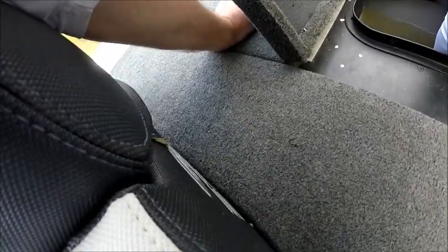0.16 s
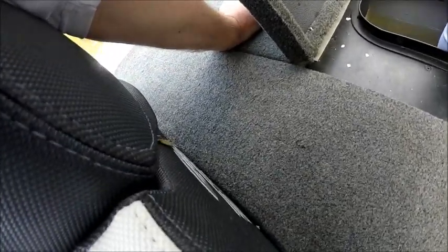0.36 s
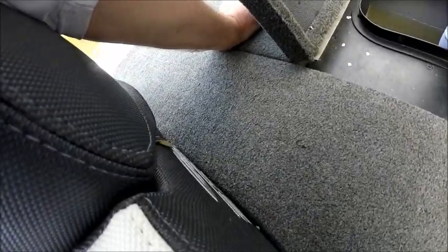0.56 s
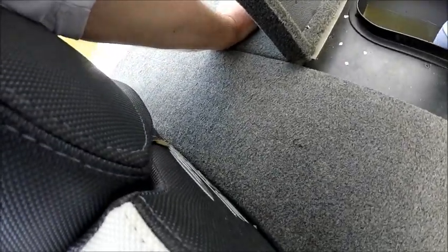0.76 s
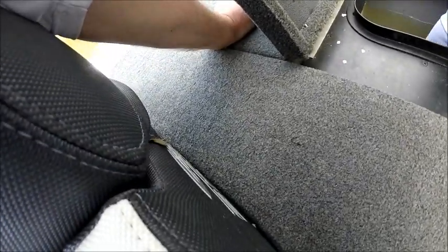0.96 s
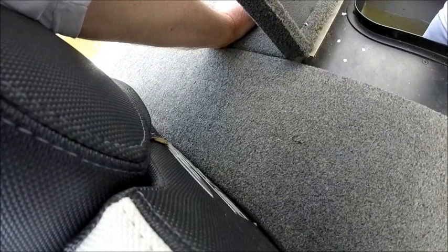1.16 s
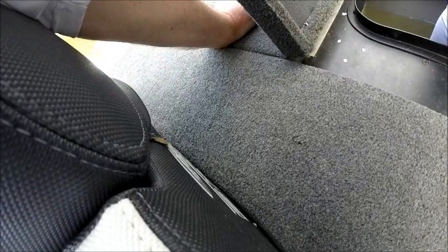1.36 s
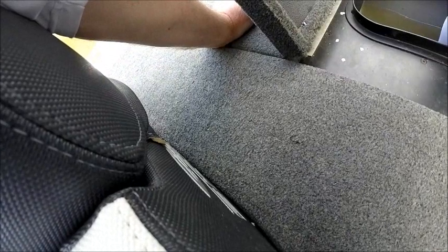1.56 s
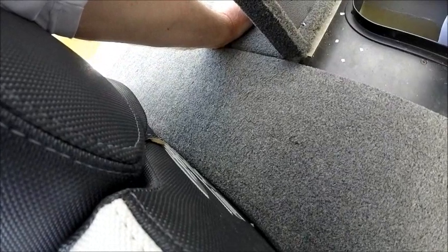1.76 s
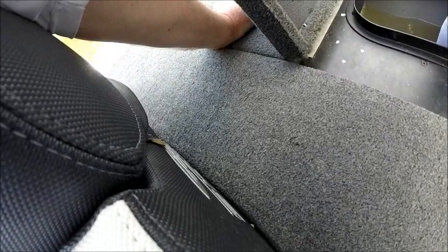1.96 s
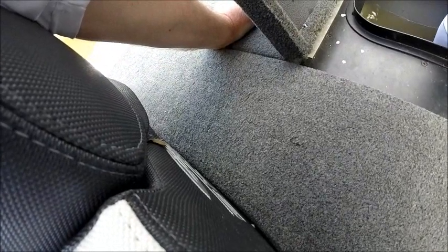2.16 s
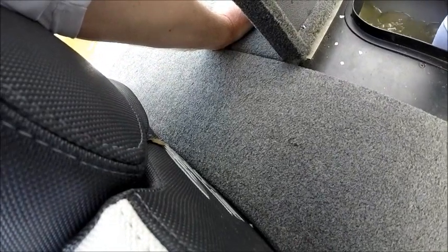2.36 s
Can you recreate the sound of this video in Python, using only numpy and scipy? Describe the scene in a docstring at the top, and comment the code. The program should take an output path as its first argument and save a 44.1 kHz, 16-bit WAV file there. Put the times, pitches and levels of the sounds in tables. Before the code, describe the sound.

A fish thrashes in a boat's water tank: after a quiet open-air start with a faint squeak, heavy muffled thumps and sloshing burst out, then a sharp wet slap and spray, close to a small microphone on deck.

```python
"""A fish thrashes in the water tank of a small boat: decaying low swings thump the walls, and random
knocks on the tank resonances make the surge and rattle. Its tail rings the rim's modes; slaps, drops and
spray are swarms of ringing bubbles. A thin squeak, a gliding tone with echoes, rises at the start over quiet
open air, shaped noise. A small microphone with slow gain control lies on the deck."""
import sys
import numpy as np
from scipy import signal
from scipy.fft import rfft, irfft
from scipy.io import wavfile
from scipy.ndimage import uniform_filter1d

SR = 44100
rng = np.random.default_rng(int(sys.argv[2]) if len(sys.argv) > 2 else 0)


def nominal_scale(level):
    """Amplitude ratio for a level in decibels (scalar or array-like)."""
    x = np.asarray(level, float) / 20
    return 10 ** x


def put_to_file(sound):
    """Save the sound as 16-bit audio at rate SR, in the file named by the first command-line argument."""
    columns = np.atleast_2d(sound).T  # one column per channel
    safe = np.clip(columns, -1, 1)
    whole_steps = np.round(safe * 32767)
    wavfile.write(sys.argv[1], SR, whole_steps.astype(np.int16))


N = 110250


def rms_one(x):
    """Normalization: the root mean square becomes 1."""
    return x / np.sqrt(np.mean(x ** 2) + 1e-20)


def in_time(rows):
    """Linear interpolation: the columns after time [s], read at every sample."""
    s, *columns = np.transpose(rows)
    return [np.interp(np.arange(N) / SR, s, c) for c in columns]


def at_hz(points, hz):
    """Logarithmic frequency scale: a spectrum table is interpolated along log frequency."""
    table_hz, level_db = np.transpose(points)
    return np.interp(np.log(hz + 1e-9), np.log(table_hz), level_db)


def drift(rate_hz):
    """Low-pass noise: two equal poles leave slow random motion of rms 1."""
    r = np.exp(-2 * np.pi * rate_hz / SR)
    noise = rng.standard_normal(N + SR)
    return rms_one(signal.lfilter([1], [1, -2 * r, r * r], noise)[SR:])  # the first second settles


def ring(clicks, hz, t60):
    """Damped resonator: a unit click starts a decaying sine of height near 1."""
    r = nominal_scale(-60 / (max(t60, 0.002) * SR))
    w = 2 * np.pi * min(hz, 0.45 * SR) / SR
    return signal.lfilter([0, np.sin(w)], [1, -2 * r * np.cos(w), r * r], clicks + 1e-18)


def grains(length, per_s, spread_db):
    """Poisson-like process: clicks of random time, sign and size."""
    size = nominal_scale(spread_db * np.minimum(rng.exponential(1, length), 4))
    size = size * rng.choice([-1, 1], length)
    return size * (rng.random(length) < per_s / SR)


def add(out, s, x):
    """Superposition: x is laid into out from time s [s]."""
    i = int(s * SR)
    out[i:i + len(x)] += x[:len(out) - i]


def air():
    """Broadband noise: shaped spectra of independent mid and side give open air, wider in the treble."""
    # spectrum shape of the air: (frequency [Hz], relative density [dB per Hz])
    air_colour = [(15, -46.5), (25, 10), (70, -1.5), (463, -19.5), (3250, -27.5), (14800, -35.5)]
    # stereo width: (frequency [Hz], side minus mid [dB])
    air_side = [(60, -18.5), (2400, -14.5), (15000, -2)]
    mid_rms_db = -52
    hz = np.arange(N // 2 + 1) * SR / N
    shape_db = at_hz(air_colour, hz) + [[0], [1]] * at_hz(air_side, hz)
    mid, side = irfft(rfft(rng.standard_normal((2, N))) * nominal_scale(shape_db), N)
    return nominal_scale(mid_rms_db) * (mid + side * [[1], [-1]]) / np.sqrt(np.mean(mid ** 2))


def squeak():
    """Frequency modulation and reverberation: an unsteady gliding note, its octave, and shore echoes."""
    # thin far squeak, perhaps a bird: (time [s], mean pitch [Hz], level before flutter [dB])
    glide = [(0, 2390, -59.5), (.055, 2680, -55.5), (.11, 2975, -61), (.17, 3124, -55), (.19, 3030, -61)]
    wobble_hz, flutter_db, octave_db = 60.5, 3.5, -11.5
    shore_db, shore_t60_s = -3, 1
    hz, db = in_time(glide)
    phase = 2 * np.pi * np.cumsum(hz + wobble_hz * drift(175)) / SR
    sounding = np.arange(N) < glide[-1][0] * SR
    size = np.sqrt(2) * nominal_scale(db + flutter_db * drift(77)) * sounding
    t = np.arange(SR // 2) / SR
    shore = rng.standard_normal(len(t)) * nominal_scale(-60 * t / shore_t60_s)
    shore = shore / np.sqrt(np.sum(shore ** 2))  # unit energy
    echo = signal.fftconvolve(size * np.sin(phase), shore)[:N]
    octave = nominal_scale(octave_db + flutter_db * drift(100)) * np.sin(2 * phase)
    return size * (np.sin(phase) + octave) + nominal_scale(shore_db) * echo


def spray():
    """Bubble resonance: many small drops each ring briefly at one of 24 pitches."""
    # falling spray: (time [s], level [dB])
    spray_level = [(2.14, -61), (2.34, -42.5), (2.5, -51)]
    # spectrum shape of the drops: (frequency [Hz], relative density [dB per Hz])
    spray_colour = [(530, -36), (900, 0.5), (1980, -2), (5910, -16.5), (15500, -26)]
    drops_per_s, decay_cycles = 2200, 73  # rate before its drift; cycles to fall 60 dB
    db, = in_time([(spray_level[0][0] - 0.03, -100)] + list(spray_level))  # fades in over 30 ms
    born = grains(N, drops_per_s * nominal_scale(2.3 * drift(10)), 3.1)
    dealt = rng.integers(0, 24, N)  # the pitch given to each drop
    drops = 0
    for k, hz in enumerate(np.geomspace(1000, 15000, num=24)):
        ringing = ring(born * (dealt == k), hz, decay_cycles / hz)
        drops = drops + nominal_scale(at_hz(spray_colour, hz)) * hz * ringing
    return nominal_scale(db) * rms_one(drops)


def splashes():
    """Bubble resonance: a smack, then a dying swarm of tiny bubbles spread round a centre pitch."""
    # slaps and drops at the surface:
    # (time [s], swarm rms before envelope [dB], centre [Hz], t60 [s], width [octaves])
    splash_list = [(0.158, -53, 3530, 0.36, 0.58), (.234, -49, 750, 0.054, 1.34),
                   (0.478, -51.5, 1020, 0.03, 0.54), (0.619, -54, 380, 1, 0.77),
                   (0.794, -47.5, 419, 0.51, 0.35), (0.862, -49.5, 6000, 0.034, 1.9),
                   (.922, -48, 5350, 0.044, 1.4), (0.998, -42.5, 2530, 0.063, 2.16),
                   (1.194, -39.5, 5930, 0.039, 0.94), (1.276, -47, 1320, 0.069, 1.8),
                   (1.459, -27, 1900, 0.11, 1.9), (1.459, -28, 4360, 0.07, 0.52),
                   (1.523, -29.5, 1500, 0.13, 1.41), (1.622, -32, 1926, 0.12, 2.13),
                   (1.657, -33, 2364, 0.064, 2.02), (1.693, -40.5, 1700, 0.34, 2),
                   (1.796, -24, 1125, 0.11, 1.22), (1.843, -27, 1750, 0.028, 2.98),
                   (1.967, -40.5, 1725, 0.16, 1.53), (2.045, -38, 1950, 0.13, 1.47),
                   (2.152, -28, 1750, 0.092, 1.23), (2.192, -27, 2160, 0.14, 1.33),
                   (2.214, -29, 5200, 0.046, 0.65), (2.24, -20, 2450, 0.16, 0.74),
                   (2.242, -34, 8500, 0.032, 1.0), (2.249, -28, 1290, 0.37, 0.13),
                   (2.319, -29, 1940, 0.055, 1.58), (2.33, -32.5, 4880, 0.038, 1.33),
                   (2.419, -34, 1510, 0.11, 0.053), (2.43, -29, 2700, 0.16, 0.69),
                   (2.47, -35.5, 1440, 0.12, 0.052), (2.423, -34.5, 4800, 0.11, 2.4),
                   (2.465, -35.5, 4600, 0.047, 1.66)]
    smack_db = 16  # over one bubble of the smallest size
    attack_share, decay_cycles = 0.019, 17.2  # rise time over t60; cycles to fall 60 dB
    grains_per_s = 9000
    out, t = np.zeros(N), np.arange(SR // 4) / SR
    spread = np.linspace(-2, 2, 12)  # pitch offsets in half widths
    for s, db, centre_hz, t60, octaves in splash_list:
        born = grains(len(t), grains_per_s, 3.2)
        dealt = rng.integers(0, 12, len(t))  # the pitch given to each bubble
        smack = nominal_scale(smack_db) * (t == 0) * rng.choice([-1, 1], (12, 1))
        swarm = 0
        for k, u in enumerate(spread):
            hz = centre_hz * 2 ** (u * octaves / 2)
            weight = np.exp(-u * u / 2) * 2 ** (u * octaves / 4)
            swarm = swarm + weight * ring(born * (dealt == k) + smack[k], hz, decay_cycles / hz)
        envelope = (1 - np.exp(-t / (attack_share * t60))) * nominal_scale(-60 * t / t60)
        add(out, s, nominal_scale(db) * rms_one(swarm) * envelope)
    return out


def rim():
    """Modal excitation: the tail slaps the hard rim and bounces, each touch striking modes unequally."""
    # touches of the tail: (time [s], level [dB])
    touches = [(2.2385, -27), (2.2405, -25.5), (2.2525, -29.5)]
    # modes of the rim: (frequency [Hz], mean level added to a touch [dB])
    modes = [(1545, 1), (1739, 1.5), (1950, 11.5), (2159, 16), (2520, 9.5), (3908, 0), (4500, 2.5)]
    decay_cycles = 128  # to fall 60 dB
    s, db = np.transpose(touches)
    out = 0
    for hz, level_db in modes:
        clicks = np.zeros(N)
        strength = nominal_scale(db + level_db + rng.normal(0, 2.5, len(s)))
        clicks[(s * SR).astype(int)] = strength * rng.choice([-1, 1], len(s))
        out = out + ring(clicks, hz, decay_cycles / hz)
    return out


def surge(shaken):
    """Random excitation of resonators: water, and the tank shaken by thumps, knock each resonance."""
    # water surging against the tank: (time [s], level before the tilt [dB])
    water_level = [(0, -81), (1.29, -46.5), (1.32, -30.5), (1.5, -39), (1.83, -21.5), (1.93, -25.5),
                   (2.0, -17.5), (2.5, -32.5)]
    # resonances of tank and deck: (frequency [Hz], relative level [dB])
    tank = [(62, -2), (80, -3), (101, -1), (135, -15), (162, 0), (209, -4), (265, 2), (450, -3.5),
            (530, -2), (640, -7.5), (1100, -10.5)]
    knocks_per_s, spread_db, decay_cycles = 210, 1.5, 18.2  # cycles to fall 60 dB
    tilt_db_per_octave = -3  # water dulls toward higher resonances
    water_db, = in_time(water_level)
    knocks = []
    for hz, level_db in tank:
        clicks = grains(N, knocks_per_s, spread_db)
        knocks.append((nominal_scale(level_db) * clicks * np.sqrt(hz), hz))
    scale = np.std(sum(ring(k, hz, decay_cycles / hz) for k, hz in knocks))
    out = 0
    for k, hz in knocks:
        octaves_up = np.log2(hz / tank[0][0])
        drive = nominal_scale(water_db + tilt_db_per_octave * octaves_up) + shaken
        out = out + ring(k * drive, hz, decay_cycles / hz)
    return out / scale


def thumps():
    """Damped oscillation: each thump swells, sinks in pitch and dies; also gives the tank's shaking."""
    # the body thumps the wall, levels ahead of the wall's filtering:
    # (time [s], envelope peak [dB], initial pitch [Hz], t60 [s], initial tank shaking [dB])
    thump_list = [(0.235, -30, 333, 0.018, -65), (.997, -36.5, 350, 0.041, -69),
                  (1.28, -30.5, 316, 0.043, -44), (1.309, -27.5, 112, 0.086, -35.5),
                  (1.357, -24, 83, 0.34, -60), (1.453, -5.5, 164.2, 0.13, -11),
                  (1.474, -8.5, 111.1, 0.44, -7), (1.507, -5.5, 106.4, 0.14, -12),
                  (1.533, -10.5, 543, 0.14, -15), (1.591, -15, 80.6, 0.61, -24),
                  (1.66, 4, 176, 0.024, -12.5), (1.69, -5, 96, 0.21, -32), (1.732, -7.5, 96.8, 0.092, -26),
                  (1.798, 5, 367, 0.011, -6), (1.81, -1.5, 310, 0.017, -35), (1.8463, 9, 285, 0.012, -42),
                  (1.972, -5.5, 209, 0.022, -21.5), (2.007, -8, 98.6, 0.14, -52),
                  (2.046, -2, 266, 0.064, -25.5), (2.112, -10, 165, 0.026, -21.5),
                  (2.152, -9.5, 189, 0.095, -13), (2.19, -22, 170, 0.048, -17),
                  (2.215, -19, 141, 0.07, -64), (2.332, -17.5, 125, 0.049, -26.5)]
    attack_cycles, pitch_sag = 0.1, 0.15  # rise time; share by which the pitch sinks over t60
    rattle_t60_s = 0.14
    out, shaken, t = np.zeros(N), np.zeros(N), np.arange(SR // 3) / SR
    for s, db, hz, t60, rattle_db in thump_list:
        shape = (1 - np.exp(-t * hz / attack_cycles)) * nominal_scale(-60 * t / t60)
        pitch = hz * (1 - pitch_sag * np.minimum(t / t60, 1))
        phase = 2 * np.pi * np.cumsum(pitch) / SR
        add(out, s, nominal_scale(db) * shape / shape.max() * np.sin(phase))
        add(shaken, s, nominal_scale(rattle_db - 60 * t / rattle_t60_s))
    return out, shaken


def scene():
    """Transmission and reflection: walls pass mainly lows; faint deck echoes differ left and right."""
    wall_cut_hz, open_lid_db = 513, -11.5  # a little escapes undulled by the open lid
    deck_echo_db, deck_echo_t60_s = -29.5, 0.034
    body, shaken = thumps()
    inside = body + surge(shaken)
    wall = signal.butter(6, wall_cut_hz, fs=SR, output="sos")
    outside = signal.sosfilt(wall, inside) + nominal_scale(open_lid_db) * inside
    near = outside + splashes() + rim() + spray() + squeak()
    t = np.arange(SR // 8) / SR
    echo = rng.standard_normal(len(t)) * nominal_scale(-60 * t / deck_echo_t60_s)
    echo = echo / np.sqrt(np.sum(echo ** 2))  # unit energy
    side = signal.fftconvolve(near, echo)[:N]
    return near + nominal_scale(deck_echo_db) * side * [[1], [-1]] + air()


def top_cut(x):
    """Nothing passes above the cut-off."""
    return signal.sosfilt(signal.butter(12, 16480, fs=SR, output="sos"), x)


def record(dry):
    """Dynamic compression: slow gain control turns down after loud passages; both band ends are cut."""
    knee_db, squeeze = -23, 0.82  # dB of reduction wanted per dB over the knee
    attack_s, release_s = 0.49, 0.19
    top_cut_hz, low_cut_hz = 16500, 38
    power = uniform_filter1d(np.mean(dry ** 2, axis=0), size=2048)[::64]
    level_db = 10 * np.log10(power + 1e-12)
    wanted_db = -squeeze * np.maximum(level_db - knee_db, 0)
    gain_db, now = np.zeros(len(level_db)), 0
    for i, want in enumerate(wanted_db):
        now += (want - now) * 64 / SR / (attack_s if want < now else release_s)
        gain_db[i] = now
    x = dry * nominal_scale(np.interp(np.arange(N) / 64, np.arange(len(gain_db)), gain_db))
    x = signal.sosfilt(signal.cheby2(12, 60, top_cut_hz, fs=SR, output="sos"), x)
    x = signal.sosfilt(signal.butter(2, low_cut_hz, "high", fs=SR, output="sos"), x)
    mix = np.clip(x, -1, 1)
    return top_cut(mix)


dry = scene()
out = record(dry)
put_to_file(out)
```